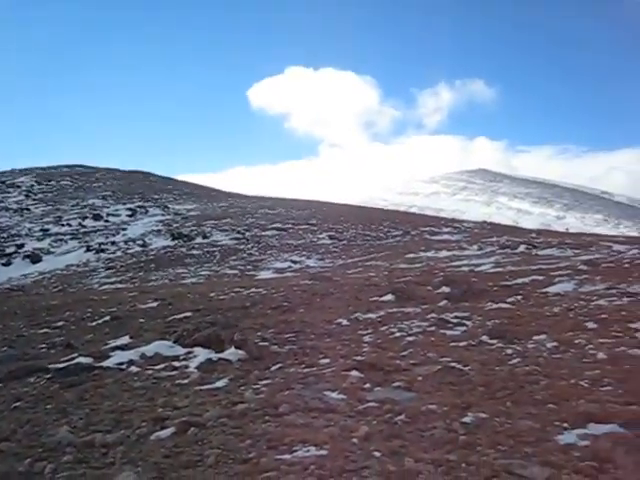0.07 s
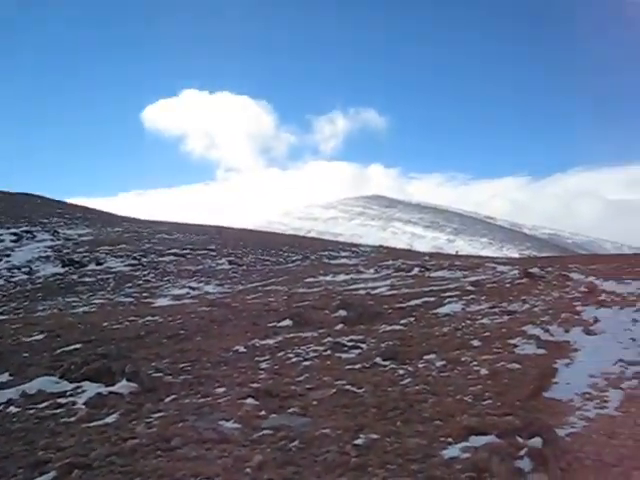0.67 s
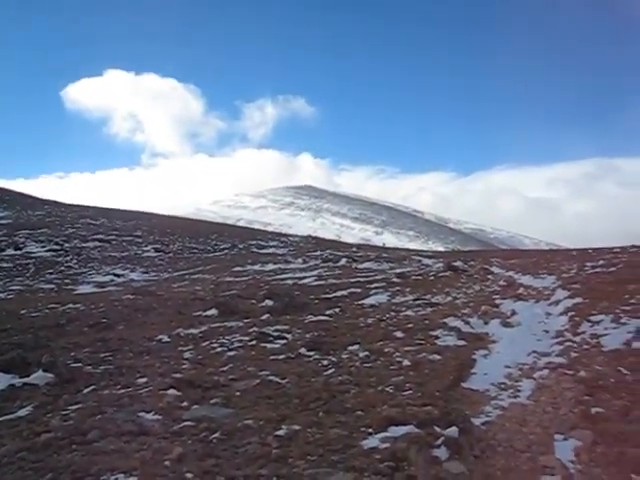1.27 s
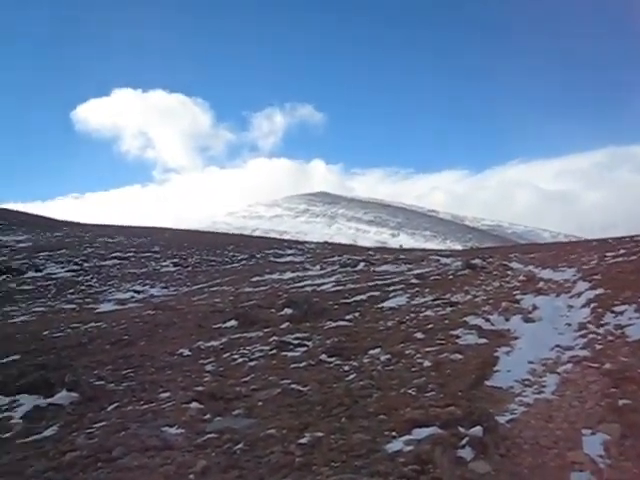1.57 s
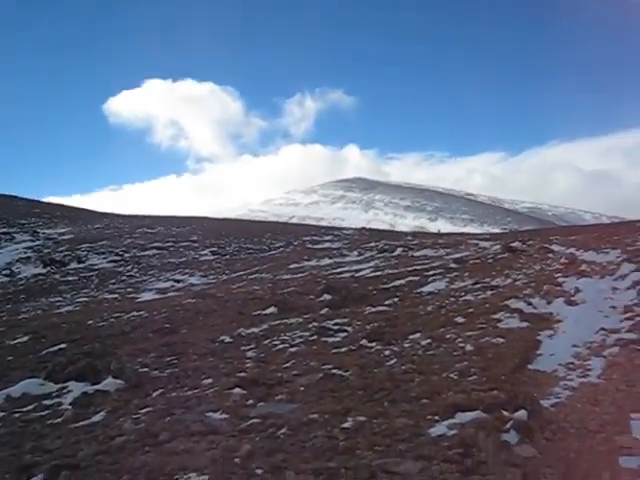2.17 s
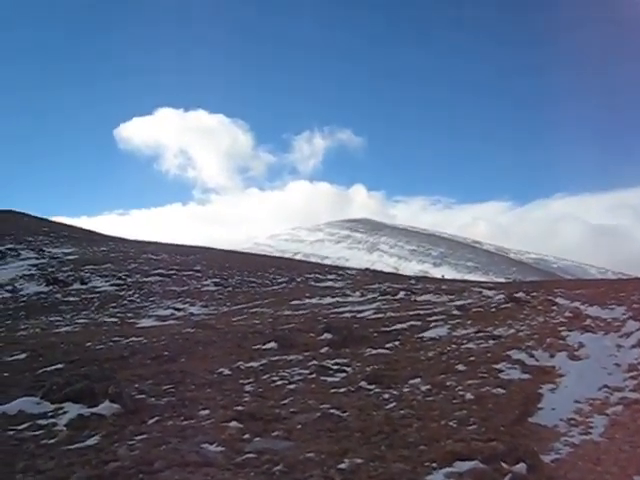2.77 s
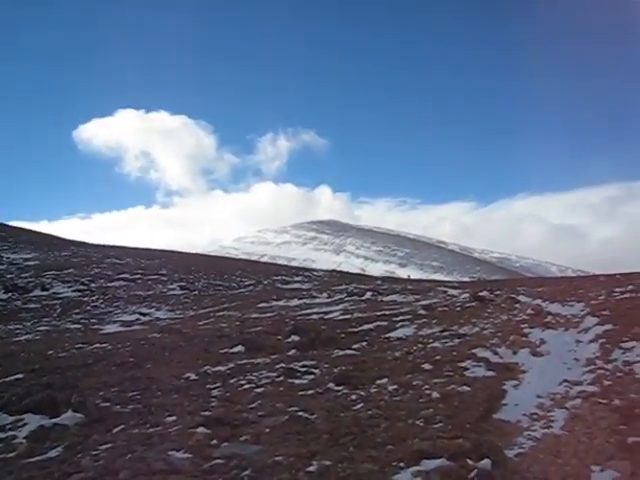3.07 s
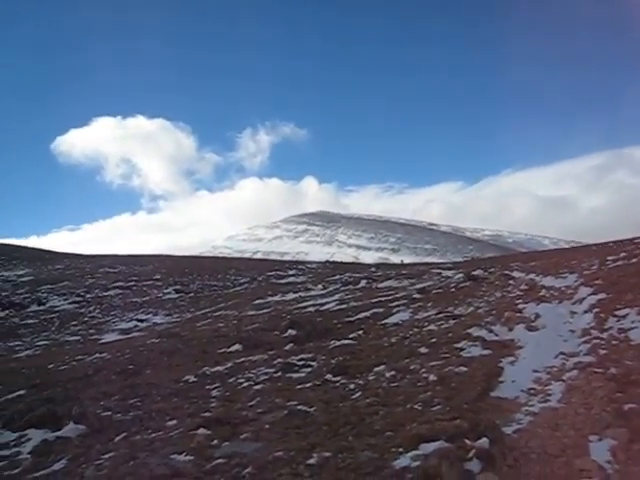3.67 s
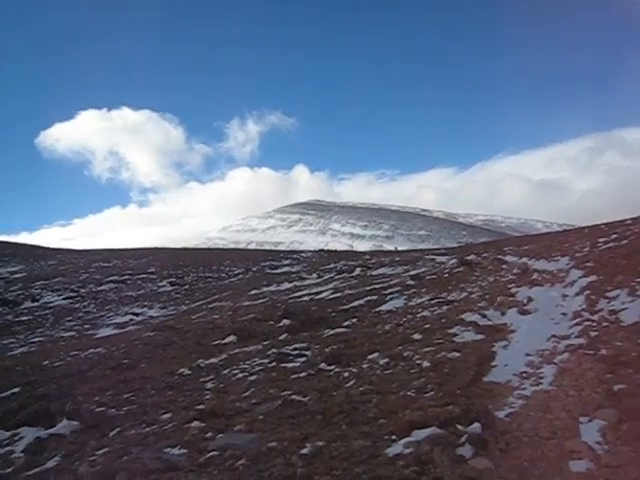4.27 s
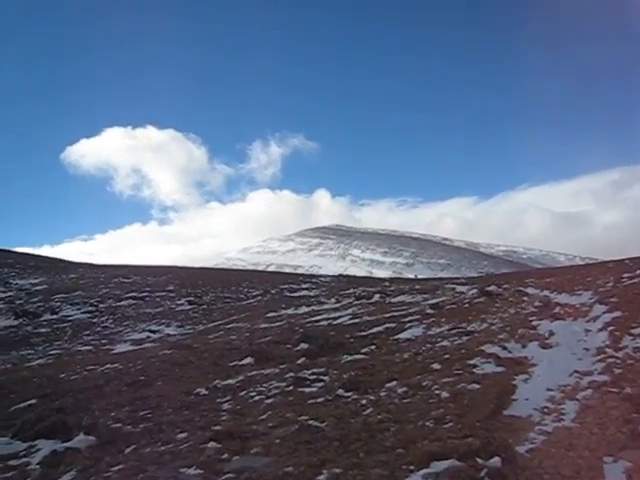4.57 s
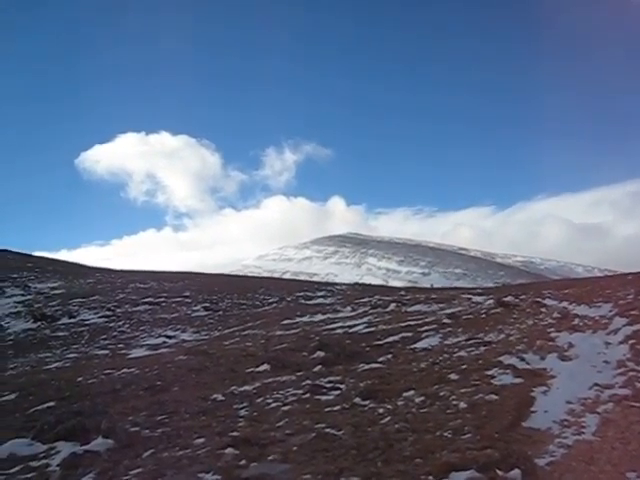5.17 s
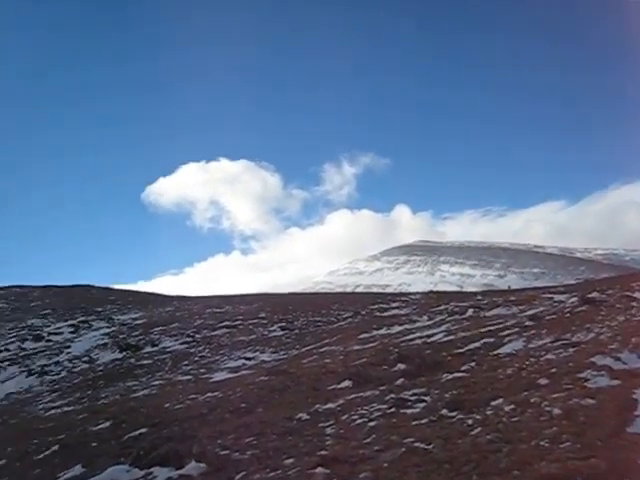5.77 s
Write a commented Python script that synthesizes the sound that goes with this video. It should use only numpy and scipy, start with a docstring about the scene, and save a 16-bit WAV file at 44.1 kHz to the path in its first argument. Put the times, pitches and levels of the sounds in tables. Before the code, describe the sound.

Strong wind buffets and overloads the microphone, a rumbling, crackling rush with a harder gust partway through.

```python
"""Ridge wind overloading a microphone

Strong wind on a bare mountain ridge blows straight onto a small camera microphone. Big eddies, swirls
and fine turbulence at the port drive it far into overload, so the rush tears and crackles; the heaviest
surges pin it to one side and choke the sound for a moment. Between two lulls comes a harder gust in
two waves, the first a low roar, the second a hiss. A pressure of 1 (0 dB) is the overload point."""
import sys
import numpy as np
from scipy.fft import rfft, irfft, next_fast_len
from scipy.io import wavfile
from scipy.ndimage import map_coordinates

SR = 44100
rng = np.random.default_rng(int(sys.argv[2]) if len(sys.argv) > 2 else 0)


def master_out(mix):
    """Clip the mix to full scale and print it as 16-bit PCM to the path in sys.argv[1]."""
    frames = np.transpose(np.atleast_2d(mix))
    ceiling = np.clip(frames, -1, 1)
    pcm = np.round(ceiling * 32767).astype(np.int16)
    wavfile.write(sys.argv[1], SR, pcm)


N = 265526


def amp(db):
    """Amplitude ratio of a level in decibels."""
    return 10 ** (np.asarray(db) / 20)


def unit(x):
    """Normalisation to rms 1."""
    return x / np.sqrt(np.mean(x ** 2) + 1e-20)


def colour(points, hz):
    """Magnitude response: (frequency_hz, level_db) points joined on a log-frequency axis."""
    f, db = np.transpose(points)
    return amp(np.interp(np.log(hz + 1), np.log(f + 1), db))


def curves(rows):
    """Linear interpolation: one value per sample for each column after the time."""
    times, *columns = np.transpose(rows)
    return [np.interp(np.arange(N) / SR, times, column) for column in columns]


def wobble(rate):
    """Smooth random modulation: a spline through Gaussian knots, rate knots a second."""
    return map_coordinates(rng.standard_normal(8192), [np.arange(N) * rate / SR], mode="wrap")


def swell(s, length, order=2):
    """Generalised Gaussian pulse of height 1 at time s; a higher order squares its shape."""
    bump = np.zeros(N)
    near = np.arange(max(int((s - 2 * length) * SR), 0), min(int((s + 2 * length) * SR), N))
    bump[near] = np.exp(-np.abs(2 * (near / SR - s) / length) ** order)
    return bump


def filtered(x, response):
    """Linear filtering: the spectrum of x times a complex frequency response."""
    size = next_fast_len(N + SR // 2)
    return irfft(rfft(x, size) * response(np.fft.rfftfreq(size, 1 / SR)), size)[:N]


def noise(spectrum):
    """Spectral shaping of white noise, scaled to rms 1."""
    return unit(filtered(rng.standard_normal(N), lambda hz: colour(spectrum, hz)))


def saturate(x, hardness):
    """Soft clipping: linear while x is small, flattening out at +-1."""
    return x / (1 + np.abs(x) ** hardness) ** (1 / hardness)


def big_eddies(calm_db=-2, wander_rad=0.61):
    """Buffeting: low random pressure gives way to booms and hoots as orderly vortex trains roll past."""
    # Pressure spectrum of the big eddies: frequency_hz, density_db
    spectrum = [(8, -6), (20, -3), (45, 0.5), (80, -1.5), (140, -3), (250, -9.5), (500, -24), (1500, -61.5)]
    # Vortex trains, relative to the random eddies: centre_s, length_s, pitch_hz, level_db
    trains = [(0.15, 0.12, 75.25, -2.5), (0.317, 0.073, 113, -2.5), (0.488, 0.028, 292, 0.5),
              (0.795, 0.06, 231, -5.5), (0.849, 0.048, 263, 0), (0.986, 0.041, 188, 1.5),
              (1.271, 0.055, 127.1, -1), (1.842, 0.057, 86.14, 1), (1.904, 0.05, 188.2, -4.5),
              (2.31, 0.067, 339.4, -3), (2.791, 0.09, 94.2, 0), (3.081, 0.045, 170, 2.5),
              (3.542, 0.058, 110.8, 0), (3.934, 0.066, 65, -2), (4.066, 0.094, 97.4, 0),
              (4.347, 0.07, 113.4, -2), (4.508, 0.041, 294.6, -1.5), (4.825, 0.053, 128.6, -1),
              (4.969, .08, 72.76, 1.5), (5.312, .05, 245, -2), (5.717, 0.071, 124.8, -2),
              (5.82, .06, 152, -0.5), (5.933, 0.05, 97, -2.5), (5.964, 0.023, 470, 4.5)]
    t = np.arange(N) / SR
    wander = wander_rad * wobble(rate=45)
    booms, cover = np.zeros(N), np.zeros(N)
    for (s, length, hz, db), turn in zip(trains, rng.random(len(trains))):
        bump = swell(s, length, order=3)
        booms += amp(db) * bump * np.sin(2 * np.pi * (hz * t + turn) + wander)
        cover += bump
    return amp(calm_db * cover) * noise(spectrum) + booms


def sputter(rate, rise_speed=4.8):
    """Intermittency: a random curve of rms 1 whose bursts rise rise_speed times faster than they die."""
    knots = rng.standard_normal(8192)
    index, part = np.divmod(np.arange(N) * rate / SR, 1)
    start, step = knots[index.astype(int)], np.diff(knots)[index.astype(int)]
    progress = np.where(step > 0, np.minimum(part * rise_speed, 1), part)
    return unit(start + step * progress)


def swirls(bursts, burst_db=2.5):
    """Mid-scale turbulence: a low roar, amplitude-modulated by the bursts of the flow."""
    # Pressure spectrum of the swirls: frequency_hz, density_db
    spectrum = [(60, -32), (170, 0.5), (350, 0), (700, -4.5), (1400, -11.5), (2800, -23.5), (6000, -55.5)]
    return unit(amp(burst_db * bursts) * noise(spectrum))


def fine_turbulence(bursts, slap_db, burst_db=0.8, crackle_db=6.0, patchy_db=1.5):
    """Small-scale intermittency: the finest eddies break each burst into crackles of hiss and fizz."""
    # Pressure spectrum of the fine turbulence: frequency_hz, density_db
    hiss_spectrum = [(300, -16.5), (1000, 1), (2000, -0.5), (3000, -1), (4200, -6), (7000, -28)]
    # Pressure spectrum of the finest turbulence: frequency_hz, density_db
    fizz_spectrum = [(1500, -28), (2800, -7), (3800, -0.5), (5000, 3.5), (7000, -6)]
    # Slow changes in the strength of the fizz: time_s, gain_db
    brightness = [(0, -11.5), (.55, 4.5), (1, -3.5), (2.25, -5), (3.5, 0.5), (4.03, -8.5), (4.4, 3),
                  (6.02, 0)]
    steady_db, top_db = 0.5, 7
    spits_db = burst_db * bursts + crackle_db * wobble(rate=480)
    unevenness = amp(-1.2 * np.maximum(slap_db, 0))  # a slap is one solid burst: it evens the crackle
    spits_db = steady_db + unevenness * (spits_db - steady_db)

    def crackling(spectrum):
        """Amplitude modulation: both bands share the crackles, and each drifts a little on its own."""
        flicker_db = np.minimum(spits_db + patchy_db * wobble(rate=55), top_db)
        return unit(amp(flicker_db) * noise(spectrum))

    hiss = amp(-0.28) * crackling(hiss_spectrum)
    fizz = amp(curves(brightness)[0] - 3.0) * crackling(fizz_spectrum)
    return hiss + fizz


def turbulence(flutter_db=-0.33, burst_top=1.1):
    """Superposition of three scales of turbulent pressure; the smaller two flutter and come in bursts."""
    # Underlying strength of the small scales at the port: time_s, swirl_db, hiss_db
    wind = [(0, -5.5, -4.5), (.28, -5, -8), (.82, -6, -18), (1.2, -7, -10), (1.41, -13, -23.5),
            (1.6, -7, -9.5), (1.8, -6, -5), (2.03, 2.5, -1), (2.37, 7.5, 1), (2.47, -5.5, -6),
            (2.56, 5, -3.5), (2.585, 7, 5.5), (2.77, 1.5, 1), (2.93, 1.5, 4), (3.03, 2.5, -1),
            (3.25, 0.5, -6.5), (3.6, -2, -5.5), (3.74, -9, -8), (3.92, -7, -10), (4.04, -14, -20.5),
            (4.24, -0.5, -7), (4.6, 0.5, -5.5), (5.55, -2.5, -9.5), (5.7, -0.5, -7.5), (5.92, -3.5, -10.5),
            (6.02, 5.5, -2)]
    # Underlying strength of the big eddies: time_s, level_db
    buffet = [(0, 3), (.5, 1), (1.4, 0.5), (2.3, 7.5), (2.8, 4.5), (3, 5.5), (3.7, 6), (4.05, -0.5),
              (4.35, 7.5), (6.02, 3.5)]
    swirl_db, hiss_db = curves(wind) + thumps() + flutter_db * wobble(rate=18)
    slap_db = slaps()
    bursts = np.minimum(sputter(rate=115), burst_top)  # capped: the flow sputters by dropping away
    eddies = amp(curves(buffet)[0] - 0.32 * slap_db) * big_eddies()  # a slap breaks up the big eddies
    roar = amp(swirl_db + 0.71 * slap_db) * swirls(bursts)
    hiss = amp(hiss_db + slap_db) * fine_turbulence(bursts, slap_db)
    return eddies + roar + hiss


def surges(pressure, calm_db, chance_count, chance_s=0.0035, chance_push=2.2):
    """One-sided overload: abrupt pushes pin the microphone and sweep the turbulence off the port."""
    # Heavy surges, signed, in multiples of the overload point: centre_s, length_s, push_ratio
    heavy = [(0.214, 0.0048, 3), (0.369, 0.0045, -3), (0.42, 0.0039, -3), (0.436, 0.0068, 3),
             (0.519, 0.0041, -3.5), (.559, .005, 3), (0.58, .008, 4), (0.67, 0.0027, 3),
             (0.688, 0.0032, -3), (0.772, 0.0056, -3), (0.892, 0.0074, 3), (0.932, .009, 4),
             (.942, .006, -4), (1.128, 0.0067, -3.5), (1.48, 0.004, 3), (1.524, 0.0134, -3.5),
             (1.537, 0.0077, 3.7), (1.572, 0.012, -4), (1.631, .007, -4), (1.645, 0.0066, 4),
             (1.737, 0.0054, -4), (1.75, 0.0098, 4), (2.098, 0.0053, -4), (2.149, .007, -4),
             (2.217, 0.0046, 4), (2.478, 0.0036, 3), (2.513, 0.0085, -3), (2.567, 0.0044, -3.5),
             (3.568, 0.0067, -3.5), (4.041, 0.0044, 3), (4.359, 0.0046, -3.5), (4.369, 0.008, 3.5),
             (4.674, 0.0079, 4), (4.687, 0.0087, -4), (4.894, .007, 3), (4.919, 0.0062, -3.5),
             (5.004, .007, 3.5), (5.04, 0.014, 3.5), (5.153, 0.0061, -3), (5.222, .009, -4),
             (5.904, 0.0064, -3), (5.928, 0.01, 3)]
    small = [(when * N / SR, chance_s * (.5 + size), chance_push * np.sign(side - .5))
             for when, size, side in rng.random((chance_count, 3))]
    push, calm = np.zeros(N), np.zeros(N)
    for s, length, strength in heavy + small:
        bump = swell(s, length, order=6)
        push += strength * bump
        calm += bump
    return push + amp(calm_db * calm) * pressure


def slaps(lull_s=0.011, lull_db=-2.5, front_s=0.0067, front_db=3):
    """Transient envelope in dB: fine turbulence draws back, hits with a hard front and briefly holds."""
    # Sharp slaps of fine turbulence: start_s, length_s, gain_db
    hits = [(0.238, 0.0097, 11.5), (0.251, 0.027, 9), (0.385, .01, 3.5), (0.452, 0.025, 1),
            (0.522, 0.027, 7.5), (0.566, 0.014, 4.5), (0.684, 0.051, 4.5), (0.953, 0.04, 6.5),
            (1.241, 0.023, 0.5), (1.47, 0.0066, 17), (1.495, 0.014, 8), (1.554, 0.0074, 4),
            (1.589, 0.013, 19), (1.663, .009, 6.5), (1.677, 0.037, 5), (1.719, 0.017, 1),
            (1.752, 0.0055, 10), (1.778, 0.0072, 5), (1.8, 0.0091, 7.5), (1.933, .016, 6.5),
            (2.022, 0.023, 3.5), (2.105, 0.0059, 8), (2.142, 0.0061, 12.5), (2.219, 0.025, 5),
            (2.345, .035, 1.5), (2.581, 0.013, 5.5), (3.21, 0.0082, 3.5), (3.269, 0.022, 4),
            (3.503, 0.013, 5.5), (3.737, 0.01, -2.5), (4.047, .008, 6.5), (4.124, 0.0046, 5.5),
            (4.206, 0.0092, 8), (4.357, 0.0076, 5.5), (4.384, 0.012, 4.5), (4.514, 0.028, 4.5),
            (4.581, 0.021, 4), (4.61, .036, 6), (4.736, 0.044, 2.5), (4.909, 0.0061, 3.5),
            (4.953, 0.021, 3.5), (5.036, 0.0078, 8), (5.072, 0.044, 6.5), (5.256, .013, 9),
            (5.269, 0.02, 8), (5.402, 0.019, 9), (5.854, 0.022, 7), (5.913, 0.02, 15)]
    return sum(db * swell(s + length / 2, length, order=8)
               + lull_db * swell(s - lull_s / 2, lull_s, order=4)
               + front_db * swell(s + front_s / 2, front_s, order=4) for s, length, db in hits)


def edge_tones():
    """Vortex shedding: air catching an edge makes a short rasp, a band of noise around one pitch."""
    # Rasps at an edge: centre_s, length_s, pitch_hz, width_hz, level_db
    rasps = [(0.393, 0.016, 4510, 2450, -4.5), (0.512, 0.0042, 4230, 1810, 0.5),
             (0.643, 0.028, 3900, 1488, -5.5), (0.719, 0.018, 3830, 910, -10.5),
             (.961, 0.0043, 5280, 1485, -8), (1.26, .005, 3274, 1806, -5.5),
             (1.777, 0.0047, 3340, 1210, -1), (3.733, 0.014, 2990, 1202, -9.5),
             (3.828, 0.0088, 3200, 1186, -9.5), (4.025, 0.0071, 2860, 1186, -14.5),
             (5.695, 0.022, 4870, 1837, -6.5)]
    t = np.arange(N) / SR
    tones = np.zeros(N)
    for s, length, hz, width, db in rasps:
        phase = 2 * np.pi * hz * t
        band = wobble(width) * np.sin(phase) + wobble(width) * np.cos(phase)
        tones += amp(db) * swell(s, length) * band
    return tones


def thumps():
    """Spectral tilt, as dB curves for swirls and hiss: the hiss drops and the low roar stands alone."""
    # Dull thumps: centre_s, length_s, swirl_gain_db, hiss_gain_db
    dips = [(0.424, 0.037, -6.5, -5), (0.773, 0.12, -5, 0), (0.88, 0.034, 3.5, 0.5), (2.081, 0.035, 0, -17),
            (2.12, 0.015, 1, -11.5), (2.165, .028, 1.5, -8), (2.268, 0.022, 0.5, -13),
            (2.326, 0.033, 2.5, -20.5), (4.505, 0.05, 1.5, -6.5), (4.78, 0.068, 1.5, -3),
            (5.162, 0.028, -2.5, -8), (5.346, 0.068, -1, -3.5), (5.559, 0.027, -1, -6.5),
            (5.944, 0.044, 2.5, -18)]
    bumps = np.array([swell(s, length, order=4) for s, length, _, _ in dips])
    return np.transpose(dips)[2:] @ bumps


def muffled(x, corner_hz=1900, share=0.41):
    """Treble shelving: each thump dulls the sound above the corner by a share of its hiss drop in dB."""
    roar = filtered(x, lambda hz: 1 / (1 + (hz / corner_hz) ** 4))
    return roar + amp(share * thumps()[1]) * (x - roar)


def scene():
    """Superposition at the port: turbulence, edge tones and surges make up the air pressure."""
    return surges(turbulence() + edge_tones(), calm_db=-5.0, chance_count=16)[None]


def record(dry, leak_hz=48, swing_db=-9, ceiling_db=-5.8, bias=0.11, rush_db=-41, top_hz=7250):
    """Clipping: the microphone's flat tops sag through two bass cuts; the amplifier rounds the peaks."""
    # Faint rush that remains in the choked moments: frequency_hz, density_db
    rush_spectrum = [(60, -13), (250, 6), (1000, -9.5), (3000, -16), (7000, -19.5)]
    # Treble response of the camera: frequency_hz, gain_db
    treble = [(2000, -0.5), (4000, 0), (5000, -5.5), (5800, -10.5), (6500, -19), (7000, -33), (7400, -59.5)]
    pinned = saturate(dry[0] + bias, hardness=2.3)  # while pinned, the fine hiss cannot get through
    sagging = amp(swing_db) * filtered(pinned, lambda hz: (1j * hz / (leak_hz + 1j * hz)) ** 2)
    rounded = amp(ceiling_db) * saturate(sagging / amp(ceiling_db), hardness=3.6)
    rush = amp(rush_db) * noise(rush_spectrum)
    return filtered(muffled(rounded) + rush, lambda hz: colour(treble, hz) * (hz < top_hz))[None]


dry = scene()
out = record(dry)
master_out(out)
```